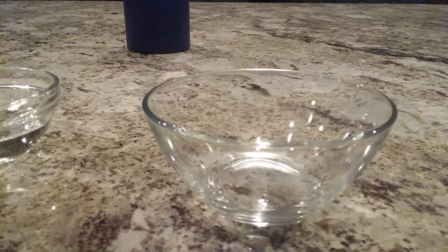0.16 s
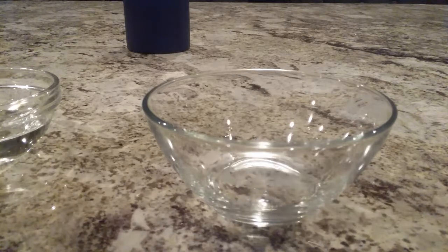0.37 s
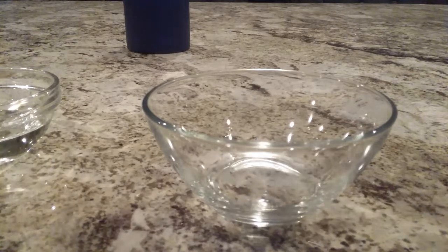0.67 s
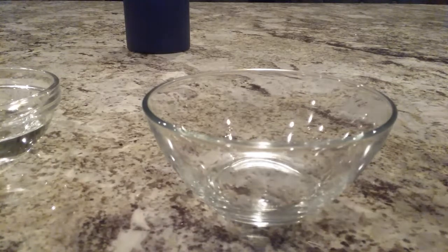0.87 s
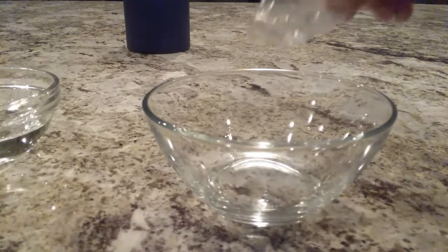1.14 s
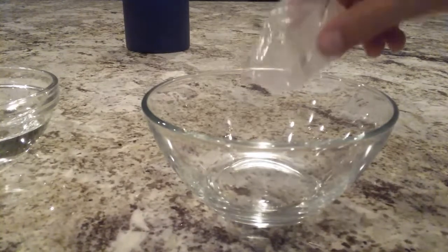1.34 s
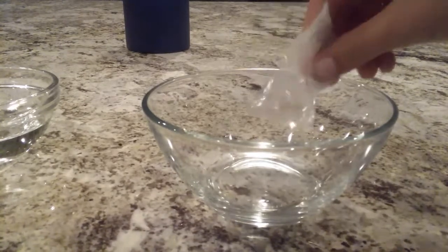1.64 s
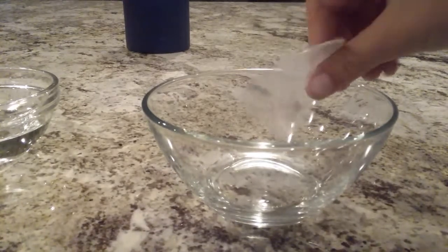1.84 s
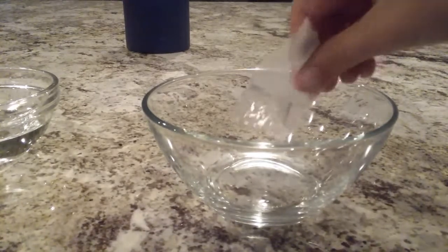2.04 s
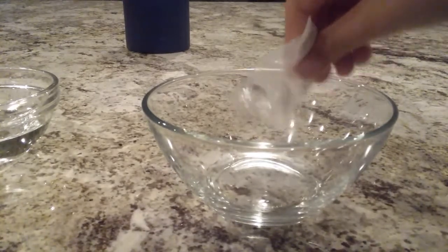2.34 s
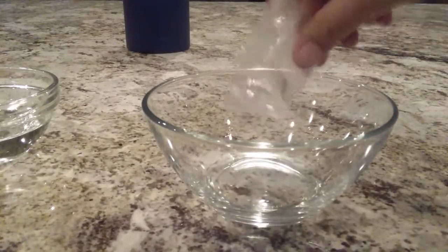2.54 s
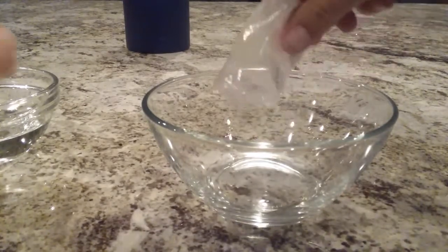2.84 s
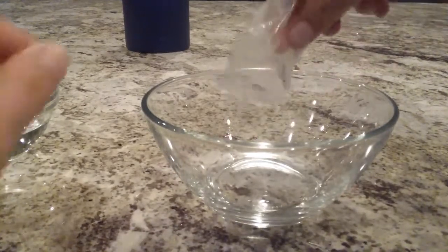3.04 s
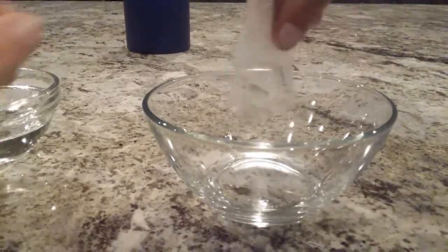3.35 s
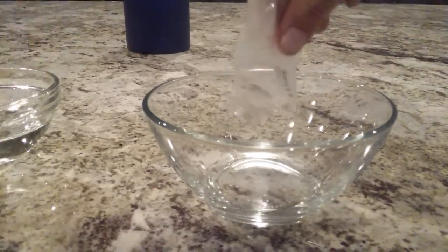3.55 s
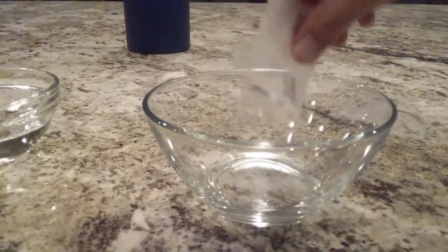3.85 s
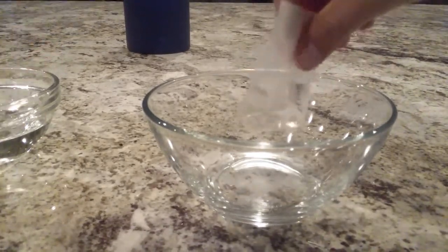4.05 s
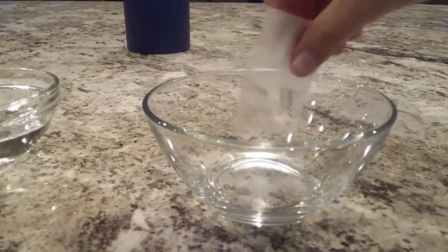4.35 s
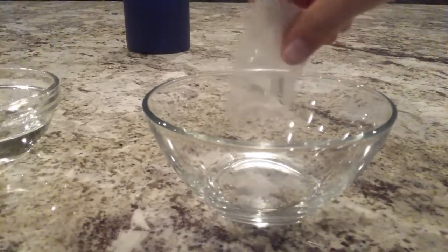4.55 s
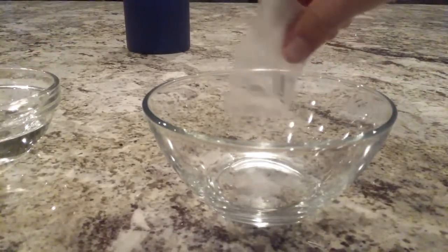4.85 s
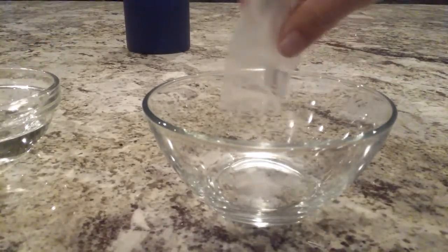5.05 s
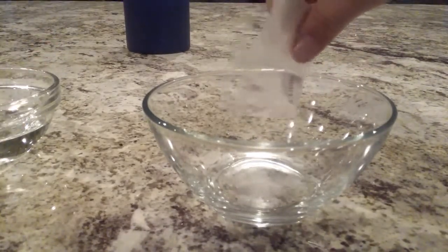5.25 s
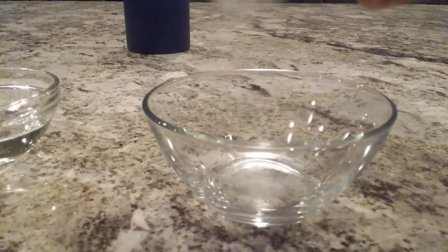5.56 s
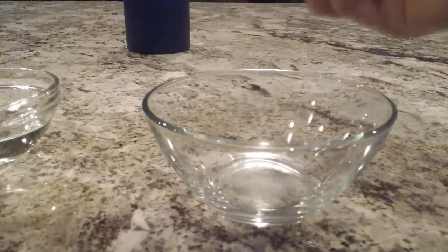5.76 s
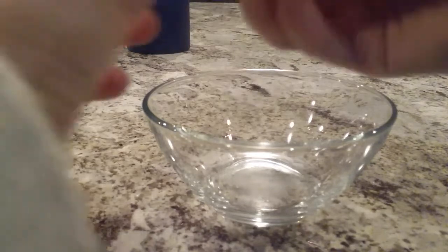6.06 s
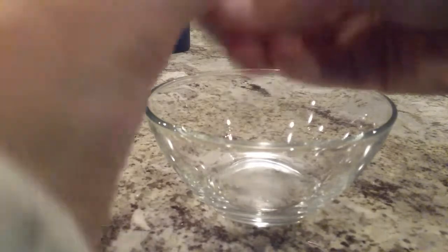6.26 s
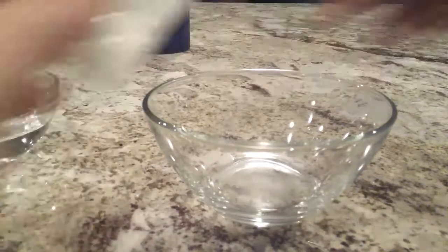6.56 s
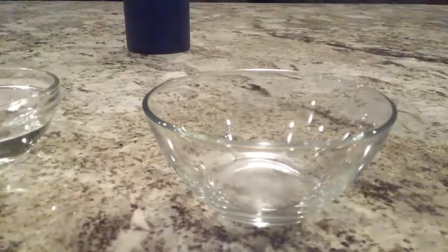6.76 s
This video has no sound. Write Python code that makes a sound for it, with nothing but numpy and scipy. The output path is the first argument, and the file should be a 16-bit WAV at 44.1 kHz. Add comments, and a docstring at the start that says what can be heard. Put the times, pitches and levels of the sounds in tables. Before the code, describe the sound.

A quiet kitchen, with a low, slowly swelling appliance hum and faint hiss. For the first second there is only very soft rustling. At about 1.5 s a small plastic packet gives a crisp snap with a tiny dull pop, then from 1.8 to 2.5 s it crackles densely: bright, dry, irregular creases and clumped finger friction, the loudest near 2.0 and 2.5 s. From 2.7 to 4.1 s it calms to faint ticks and light rustle. A sharp isolated click comes at 4.4 s, followed by small crinkles around 4.6 to 5.2 s. At 5.5 s a stronger snap carries a low puff of trapped air. Soft scattered rustling continues, with a little flurry from 6.3 s and a double snap at 6.6 s, then only hum. Close, thin, bright microphone; short hard-surface echoes.

```python
"""Quiet kitchen: a hand shakes and pinches a small plastic packet over a glass bowl.
Creases snap as noise bursts shaped by four regions of the film; trapped air thumps as decaying sines.
Fingers rustle as clumped filtered noise with tiny ringing crinkles; walls and hard surfaces answer.
An appliance hums as shaped noise; the small microphone rings near 6 kHz and hisses."""
import sys
import numpy as np
from scipy import signal
from scipy.fft import rfft, irfft, next_fast_len
from scipy.io import wavfile
from scipy.ndimage import uniform_filter1d, map_coordinates

SR = 44100
rng = np.random.default_rng(int(sys.argv[2]) if len(sys.argv) > 2 else 0)


def unload_wav(signal):
    """Save mono or channel-first audio to the path in sys.argv[1] as 16-bit WAV at rate SR, clipped to [-1, 1]."""
    wavfile.write(
        sys.argv[1],
        SR,
        np.round(np.clip(np.atleast_2d(signal).T, -1, 1) * 32767).astype(np.int16),
    )


N = 304731  # samples

# flat panels of film, relative response: freq_hz [Hz], gain_db [dB]
PANEL_RESPONSE = [(600, -31), (1300, -3), (2400, 5.5), (3200, -3.5), (4500, -32.5)]
# air-filled bag flexing, relative response: freq_hz [Hz], gain_db [dB]
POUCH_RESPONSE = [(120, -26.5), (300, 0), (700, -4), (1150, -3), (1700, -14), (3000, -53)]
# microphone port response: freq_hz [Hz], gain_db [dB]
PORT_RESPONSE = [(20, -20), (90, -1.5), (4300, -0.5), (5300, 0), (6200, 7), (7200, -1.5), (8300, -6.5),
                 (17000, -2.5)]
# quick finger strokes, level before the microphone: start_s [s], end_s [s], level_db [dB]
STROKES = [(1.036, 1.067, -68), (1.447, 1.476, -64), (1.743, 1.754, -70), (1.781, 1.808, -57.5),
           (1.827, 1.871, -59.5), (1.954, 1.984, -57.5), (2.01, 2.049, -57), (2.318, 2.375, -68),
           (2.385, 2.452, -65), (2.634, 2.694, -65), (3.226, 3.256, -60), (3.33, 3.352, -73),
           (3.43, 3.47, -76.5), (3.924, 3.94, -65), (4.046, 4.081, -72.5), (4.186, 4.206, -59),
           (4.355, 4.363, -56.5), (4.616, 4.635, -65), (4.73, 4.755, -64.5), (4.873, 4.896, -61),
           (5.038, 5.06, -67), (5.158, 5.191, -68), (5.464, 5.533, -63.5), (5.68, 5.763, -76.5),
           (5.921, 5.964, -74.5), (6.155, 6.209, -67.5), (6.326, 6.367, -61.5), (6.381, 6.474, -65.5),
           (6.49, 6.505, -67)]


def amp(db):
    """Decibels to gain."""
    return 10 ** (np.asarray(db) / 20)


def unit(x):
    """Scale to rms 1."""
    return x / np.sqrt(np.mean(x ** 2) + 1e-20)


def along(points, hz):
    """Interpolate (Hz, value) points on a log frequency axis."""
    f, v = np.transpose(points)
    return np.interp(np.log(hz + 1), np.log(f + 1), v)


def colour(x, spectrum):
    """Causal minimum-phase filtering of the last axis by a (Hz, dB) spectrum."""
    size = 4096
    gain_db = along(spectrum, np.fft.rfftfreq(size, 1 / SR))
    # fold the cepstrum to get minimum phase
    cepstrum = irfft(np.log(amp(gain_db)), size)
    cepstrum[1:size // 2] *= 2
    cepstrum[size // 2 + 1:] = 0
    kernel = irfft(np.exp(rfft(cepstrum)), size)
    x = np.atleast_2d(x)
    return signal.fftconvolve(x, kernel[None], axes=1)[:, :x.shape[1]]


def wobble(knots_per_s):
    """Smooth random curve: a spline through normal draws."""
    knots = rng.standard_normal(int(N * knots_per_s / SR) + 4)
    return map_coordinates(knots, [np.arange(N) * knots_per_s / SR])


def ring(x, centre_hz, width_hz):
    """Pass each row through its own second-order resonance."""
    size = 2 * x.shape[1]
    f = np.fft.rfftfreq(size, 1 / SR)
    damping = 1j * f * width_hz
    response = damping / (centre_hz ** 2 - f * f + damping)
    return irfft(rfft(x, size) * response, size)[:, :x.shape[1]]


def place(start_s, rows):
    """Sum rows of samples at their start times."""
    where = np.round(start_s * SR).astype(int) + np.arange(rows.shape[1])
    where = np.clip(where, 0, N)  # late strays land in a spare sample
    return np.bincount(where.ravel(), rows.ravel(), N + 1)[:N]


def low_pass(x, top_hz):
    """Remove everything from top_hz up."""
    size = next_fast_len(N + SR // 4)
    keep = np.fft.rfftfreq(size, 1 / SR) < top_hz
    return irfft(rfft(x, size) * keep, size)[..., :N]


def stroke_db(bright_db):
    """Quick strokes add their power to the slow rustle level."""
    t = np.arange(N) / SR
    power = sum(amp(2 * db) * ((t > start_s) & (t < end_s)) for start_s, end_s, db in STROKES)
    power = uniform_filter1d(power, size=200)
    return 10 * np.log10(amp(2 * bright_db) + np.abs(power))


def crinkles(level_db, count=2500):
    """Tiny creases of every size give way at random times, louder while the film is worked."""
    when, pitch, size = rng.random((count, 3)).T[:, :, None]
    t = np.arange(SR // 200) / SR
    hz = 1200 * amp(20 * pitch)  # 1.2 to 12 kHz
    noise = rng.standard_normal((count, len(t))) * amp(-60 * t / 0.009)
    burst = ring(noise, hz, width_hz=0.49 * hz)
    burst = burst / np.linalg.norm(burst, axis=1, keepdims=True)
    local_db = level_db[(when * N).astype(int)]
    loud_db = local_db + 10.0 - 2.94 * np.log(size + 0.0036)  # a few stand out
    return place(when * N / SR, amp(loud_db) * burst)


def rustle():
    """Dense faint friction of skin and cloth on film, in clumps, with crinkles on top."""
    # level before strokes and microphone: time_s [s], bright_db [dB], dull_db [dB]
    friction = [(0, -62, -66), (.12, -75.5, -70.5), (.38, -66.5, -70), (.5, -76, -70.5), (.6, -65.5, -66),
                (.68, -64, -60.5), (.75, -68.5, -70.5), (.9, -74, -70), (1.4, -76, -70.5),
                (1.5, -63, -64.5), (1.7, -69, -70.5), (1.8, -68, -64), (2.02, -55, -61.5),
                (2.3, -68.5, -74), (2.4, -54, -62), (2.52, -65, -69), (2.9, -72, -70.5),
                (3.25, -69.5, -69.5), (3.45, -76.5, -72), (3.7, -70.5, -71.5), (3.88, -69.5, -69),
                (4.049, -77, -72.5), (4.4, -73.5, -73.5), (5.351, -93.5, -76), (5.5, -74, -71.5),
                (5.9, -72, -73), (6.08, -79.5, -73.5), (6.35, -66, -69.5), (6.91, -86, -74)]
    # skin on film, relative response: freq_hz [Hz], gain_db [dB]
    skin_response = [(2000, -24), (3500, -4), (6000, 4), (9000, -0.5), (12000, -1.5), (16000, -14)]
    time_s, bright_points, dull_points = np.transpose(friction)
    t = np.arange(N) / SR
    slow_db = np.interp(t, time_s, bright_points)
    bright_db = stroke_db(slow_db)
    dull_db = np.interp(t, time_s, dull_points) + 0.55 * (bright_db - slow_db)
    clumps = amp(1.9 * wobble(7) + 2.0 * wobble(33) + 0.28 * wobble(200))
    grains = clumps * rng.standard_normal(N) * amp(0.95 * rng.exponential(size=N))
    bright = unit(colour(grains, skin_response))
    dull = unit(colour(grains, PANEL_RESPONSE) + amp(10) * colour(grains, POUCH_RESPONSE))
    friction_sound = (amp(bright_db) * bright + amp(dull_db) * dull)[0]
    return friction_sound + crinkles(bright_db)


def hum():
    """The appliance drones through the low room modes, slowly swelling."""
    # relative spectrum: freq_hz [Hz], gain_db [dB]
    room_modes = [(25, -12.5), (45, -20.5), (85, -4), (108, -10.5), (122, -6), (135, 5), (144, 1),
                  (152, 4.5), (171, -10), (190, -1), (222, -11.5), (245, -6.5), (253, -2), (261, -8),
                  (282, -8), (320, -9), (600, -23), (1200, -28.5), (2300, -37)]
    size = next_fast_len(N)
    gain = amp(along(room_modes, np.fft.rfftfreq(size, 1 / SR)))
    drone = irfft(rfft(rng.standard_normal(size)) * gain, size)[:N]
    return amp(-55.0 + 0.58 * wobble(1.6)) * unit(drone)


def hiss():
    """Steady coloured noise."""
    # relative spectrum: freq_hz [Hz], gain_db [dB]
    hiss_spectrum = [(600, -26.5), (1500, 19.5), (3800, -12), (8000, 21.5), (11000, -4), (16000, -7)]
    return amp(-88.5) * unit(colour(rng.standard_normal(N), hiss_spectrum)[0])


def crackle(count=18):
    """Each stroke sets off up to count small creases at random, at a steady mean rate; crease rows."""
    rate_per_s, silent_db = 230, -200
    over_stroke_db, spread_db = 25, 3
    centre_hz, spread_hz, length_ms = 6000, 640, 1.6
    panel_db, edge_db, colour_spread_db = -16, -9, 4  # panels and top edge against crease
    start_s, end_s, stroke_level_db = np.repeat(STROKES, count, axis=0).T
    gaps = rng.exponential(size=(len(STROKES), count))
    s = start_s + np.cumsum(gaps, axis=1).ravel() / rate_per_s
    size, pitch, panel, edge = rng.standard_normal((len(s), 4)).T
    level_db = stroke_level_db + over_stroke_db + spread_db * size
    return np.transpose([s,
                         np.where(s < end_s, level_db, silent_db),
                         centre_hz + spread_hz * pitch,
                         panel_db + colour_spread_db * panel,
                         edge_db + colour_spread_db * edge,
                         np.full(len(s), length_ms)])


def snaps():
    """Each crease creeps, buckles in one sharp release, then settles in tiny slips; four regions respond."""
    # clear snaps: release_s [s], crease_db [dB energy], crease_hz [Hz],
    # panel_db [dB re crease], edge_db [dB re crease], length_ms [ms, held to 0.3-8]
    crease_rows = [(0.9957, -55, 4570, 15, -11, 6.5), (1.0493, -33, 6040, -14, -9, 2.2),
                   (1.4197, -36.5, 6230, -11, -7, 4.8), (1.4741, -18, 4060, -2, -6, 6.3),
                   (1.483, -5, 5100, -7.5, -8, 0.99), (1.5112, -38.5, 4130, 9.5, -16, 4.8),
                   (1.7761, -5.5, 7400, -8, -1.5, 2.6), (1.8061, -9.5, 4720, -11, -8, 4.1),
                   (1.8092, -10.5, 4560, -1.5, -12, 4.4), (1.8175, -14, 6330, -12, -12, 4.7),
                   (1.8228, -3, 4330, -8.5, -3.5, 1.4), (1.834, -24, 4375, -7, -17, 6.7),
                   (1.843, -12.5, 6210, -11, -21, 1.9), (1.859, -21.5, 4920, -1, -20, 2.3),
                   (1.954, -35.5, 4000, 3, -20, 3), (1.967, -35.5, 3984, 3, -19.5, 3),
                   (1.9753, -24.5, 5520, 4.5, -25, 4), (1.988, -4.5, 5860, -17, -14, 1.4),
                   (1.9993, -3, 5200, -8, -3, 2.5), (2.0063, 3, 7440, -14, -4.5, 2.5),
                   (2.017, -20, 5310, -10, -18, 2.7), (2.033, -34.5, 4200, 5, -19.5, 4),
                   (2.0634, -22, 4600, -12, -18, 2.9), (2.1775, -23, 4930, -6, -17, 2.4),
                   (2.2049, -6, 7420, -18, -12.5, 2.6), (2.3313, -31, 5590, -2, -30, 1.7),
                   (2.3394, -28, 7140, -18, -13, .95), (2.381, -9.5, 6300, -7.5, -14, 2.2),
                   (2.4109, -5.5, 5310, -8.5, -4.5, 1.1), (2.4344, -25, 6340, -21, 1, 6.3),
                   (2.4456, -12.5, 5370, -6, -7, 3), (2.4561, -26, 4260, -7, -13, 1.3),
                   (2.4745, -29.5, 4130, -1.5, -13, 2.47), (2.4905, -22, 4810, -25, -8, 1.4),
                   (2.5061, 2.5, 6900, -24.5, -13.5, 2.3), (2.653, -28, 6560, -24, -6, 2.8),
                   (2.696, -49, 5320, 11, -.5, 2.1), (2.784, -35.5, 5160, 1.5, -16, 3.4),
                   (2.7986, -35, 6400, -19, -12, 2.7), (2.839, -39.5, 6570, -18, -4, 5.5),
                   (3.0558, -41, 4380, -19, -11, 3.7), (3.0758, -42, 4000, -17, -14, 3.7),
                   (3.1538, -36.5, 5350, -8, -13, 3.6), (3.1844, -33.5, 5140, -10, -21, 1.5),
                   (3.1888, -37, 4500, 7.5, -14, 1.9), (3.237, -22.5, 5260, -6, -4, 9.8),
                   (3.275, -27, 5660, -6.5, -9, 3), (3.3113, -37.5, 7000, -11, -5, 3.2),
                   (3.349, -41, 5700, -19, -2, 3.2), (3.4561, -38.5, 6700, -17, -7.5, 2.2),
                   (3.809, -42, 6100, -13, -5, 2.3), (3.9416, -30.5, 6380, -.5, -7.5, 2.12),
                   (4.059, -35.5, 6480, -10, -11, 2.4), (4.0723, -39.5, 5750, -21, -12, 2.4),
                   (4.144, -41.5, 4780, -1.5, -17, 4.1), (4.1743, -37, 6240, -24, -16.5, 2.7),
                   (4.2065, -18, 5630, -6, -12.5, 1.1), (4.3514, -29.5, 6740, -8, -12, 1.9),
                   (4.3705, -33, 6670, -30, -9, 1.9), (4.3989, -0.5, 6900, -26.5, -6.5, 1.23),
                   (4.463, -47, 6200, 8.5, -13, 3), (4.6131, -17.5, 6350, -16, -13.5, 3.7),
                   (4.8758, -24.5, 6000, -10, -10.5, 2.6), (4.934, -26, 4500, -10, -21, 4.4),
                   (5.0434, -29, 5670, -7.5, -8, 4.6), (5.0531, -31, 3980, -3.5, -8, 3),
                   (5.0899, -33, 6400, -16.5, -5, 1.7), (5.1575, -19.5, 6100, -20, -16, 3.1),
                   (5.1754, -29.5, 4860, -2, -6, 4.4), (5.1874, -22.5, 4850, -6, -22, 3.1),
                   (5.1955, -26.5, 4270, -11, -16.5, 1.8), (5.4398, -37, 4590, -16, -7.5, 2.4),
                   (5.4534, -33.5, 5950, -29.5, -22, 1.5), (5.465, -28, 6500, -22, -10, 1.7),
                   (5.482, -7, 6350, -15, -10, 1.6), (5.5135, -16.5, 6100, -17, -13, 5.8),
                   (5.52, -25, 6850, -11, -8, 5.3), (5.7604, -24.5, 6950, -19, -4, 2.4),
                   (5.8311, -23.5, 4560, -4, -24, 2.52), (5.8558, -29.5, 4760, -5, -8, 3.2),
                   (5.9209, -29.5, 4960, -12, 1.2, 5.2), (6.0333, -46.5, 5100, 5.5, -12, 4.4),
                   (6.1585, -35.5, 5720, -2.5, -19.5, 3.6), (6.3254, -23.5, 4860, -9.5, -13, 2.7),
                   (6.3482, -38, 5860, -17, -17, 4.8), (6.3608, -31, 5040, -4, -19, 1.5),
                   (6.4222, -24, 6360, -34, -7, 3.3), (6.6, -19.5, 5320, -7, -4, 2.1),
                   (6.6022, -16.5, 4430, -5, -14, 3)]
    # film around the crease, relative response: freq_hz [Hz], gain_db [dB]
    middle_response = [(2000, -27.5), (3500, -1), (6000, -0.5), (8000, 1.5), (11000, -25)]
    # top edge, relative response: freq_hz [Hz], gain_db [dB]
    edge_response = [(5500, -31.5), (8200, 8), (11000, 2.5), (13000, -5.5), (16300, -13), (17000, -44)]
    rows = np.vstack([crease_rows, crackle()])
    s, crease_db, crease_hz, panel_db, edge_db, length_ms = rows.T[:, :, None]
    pouch_db = -14.5 + 0.74 * panel_db  # bag against crease, partly following the panels
    lead_s = .004
    t = np.arange(SR // 40) / SR - lead_s
    life_s = np.clip(length_ms, .3, 8) / 1000
    after = np.clip(t, 0, None)

    creep = amp(-26 - 20 * np.abs(t) / .002)
    settle = amp(-22 * after / life_s) * (1 - np.exp(-after / (0.035 * life_s)))
    slips = rng.standard_normal((len(s), len(t))) * (creep + settle)
    release = np.round((lead_s + .15 * life_s) * SR) == np.arange(len(t))
    slips = slips + release * 5 * (0.001 / life_s) ** 0.53  # short snaps are mostly the release

    crease = ring(colour(slips, middle_response), crease_hz, width_hz=1500)
    regions = ((colour(slips, POUCH_RESPONSE), crease_db + pouch_db),
               (colour(slips, PANEL_RESPONSE), crease_db + panel_db),
               (crease, crease_db),
               (colour(slips, edge_response), crease_db + edge_db))
    burst = 0
    for part, level_db in regions:
        # levels are as picked up, through the port
        heard = np.linalg.norm(colour(part, PORT_RESPONSE), axis=1, keepdims=True)
        burst = burst + amp(level_db) * part / heard
    return place(s - lead_s, burst)


def thumps():
    """The bag pops its shape: a short low ring of the trapped air."""
    # start_s [s], level_db [dB, sine amplitude before microphone], pitch_hz [Hz], t60_ms [ms]
    pops = [(1.51, -40, 900, 6), (1.776, -35, 422, 7.7), (1.967, -46, 470, 40), (2.006, -49, 1244, 40),
            (2.1777, -40, 1230, 6), (2.696, -42.5, 1100, 4.9), (5.482, -32.5, 377, 19),
            (5.856, -43.5, 1020, 6), (6.0333, -40, 960, 6.9), (6.333, -43, 950, 9.4),
            (6.601, -32.5, 520, 7)]
    start_s, level_db, pitch_hz, t60_ms = np.transpose(pops)[:, :, None]
    t = np.arange(SR // 20) / SR
    decay_db = -60 * t * 1000 / np.clip(t60_ms, 2, 80)
    return place(start_s, amp(level_db + decay_db) * np.sin(2 * np.pi * pitch_hz * t))


def room(x):
    """Smeared early echoes and a diffuse tail, drawn anew for every 1/12 s of sound."""
    # counter and bowl, walls: mean_delay_ms [ms], level_db [dB energy re direct], t60_ms [ms]
    reflections = [(1.2, -13, 14), (6.5, -36, 5), (8.1, -18.5, 5.5), (16, -38.5, 8)]
    # diffuse tail: freq_hz [Hz], t60_s [s]
    decay_times = [(500, 0.74), (3000, 0.22), (6000, 0.28), (12000, 0.19)]
    out = np.zeros(N + SR)
    step = SR // 12
    t = np.arange(SR // 3) / SR
    for start in range(0, N, step):
        hz, frame_s, z = signal.stft(rng.standard_normal(len(t)), SR, nperseg=256)
        decay = amp(-60 * frame_s / along(decay_times, hz)[:, None])
        tail = signal.istft(z * decay, SR, nperseg=256)[1][:len(t)]
        build_up = 1 - np.exp(-t / 0.02)
        response = amp(-17.5) * tail / np.linalg.norm(tail) * build_up
        for delay_ms, level_db, t60_ms in reflections:
            late = t - delay_ms / 1000 * (1 + 0.097 * rng.standard_normal())
            fade = (late > 0) * amp(-60 * np.abs(late) * 1000 / t60_ms)
            smear = fade * rng.standard_normal(len(t))
            response = response + amp(level_db) * smear / np.linalg.norm(smear)
        wet = signal.fftconvolve(x[start:start + step], response)
        out[start:start + len(wet)] += wet
    return out[:N]


def scene():
    """Direct snaps and thumps, with room echoes, rustle, hum and hiss low-passed at 15.95 kHz."""
    film = snaps() + thumps()
    soft = room(film) + rustle() + hum() + hiss()
    return (film + low_pass(soft, top_hz=15950))[None]


def record(dry):
    """The microphone port resonates; nothing is kept above the band limit."""
    return low_pass(colour(dry, PORT_RESPONSE), top_hz=17070)


dry = scene()
out = record(dry)
unload_wav(out)
```